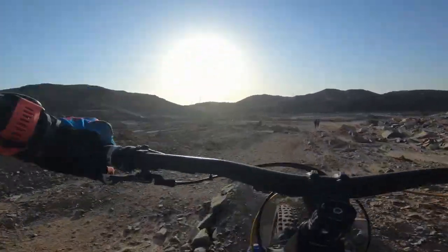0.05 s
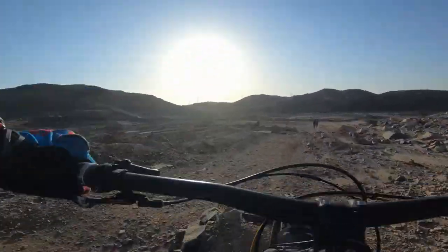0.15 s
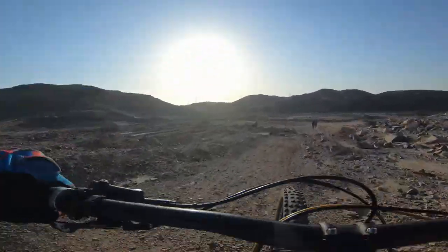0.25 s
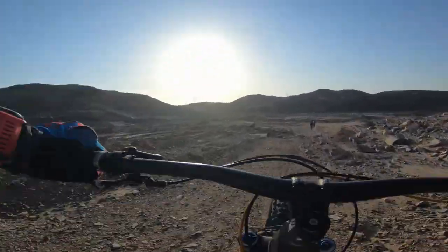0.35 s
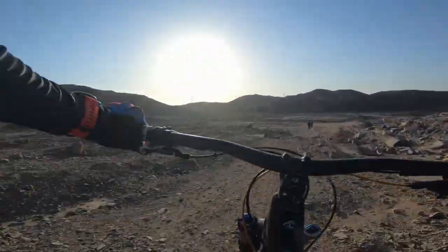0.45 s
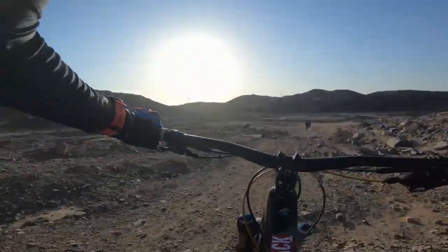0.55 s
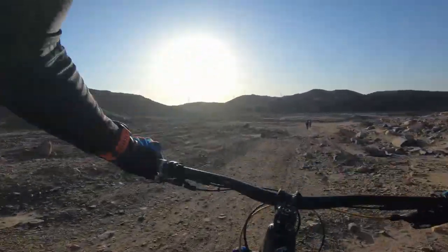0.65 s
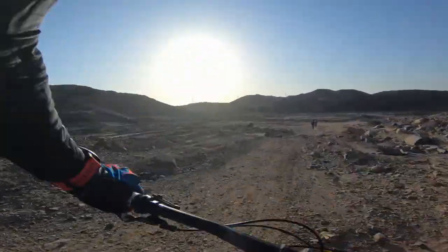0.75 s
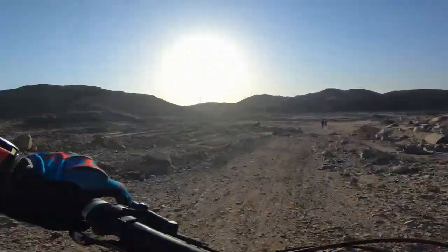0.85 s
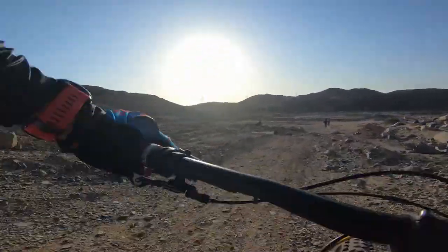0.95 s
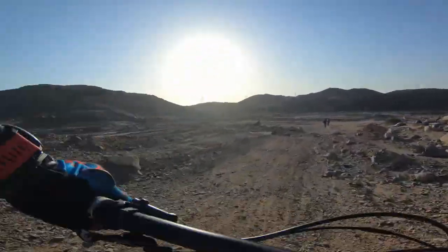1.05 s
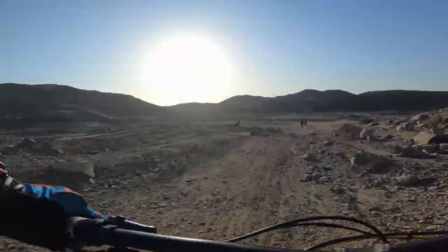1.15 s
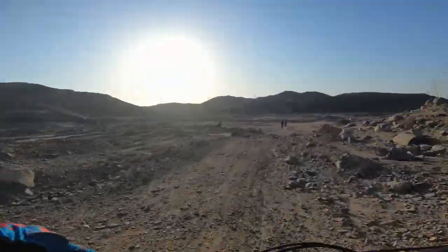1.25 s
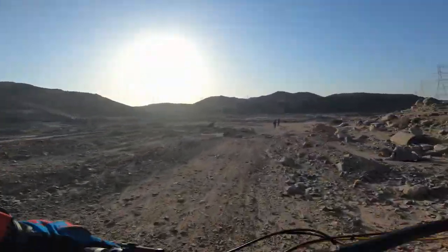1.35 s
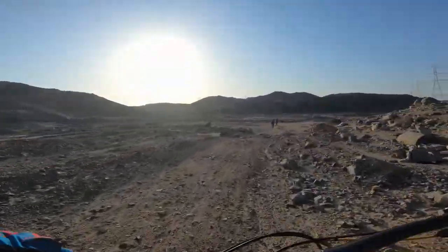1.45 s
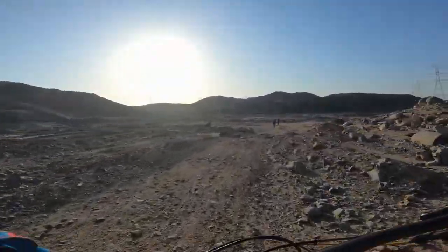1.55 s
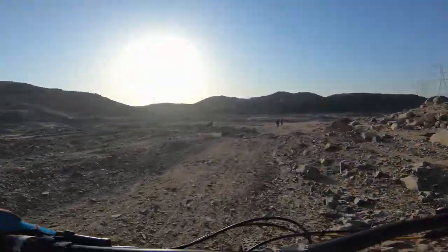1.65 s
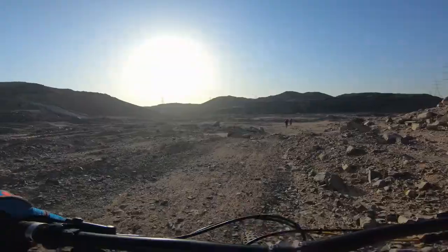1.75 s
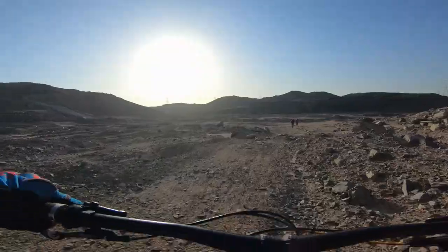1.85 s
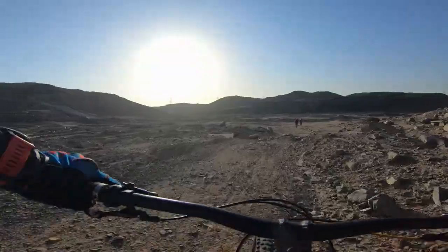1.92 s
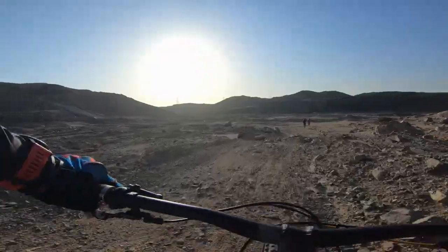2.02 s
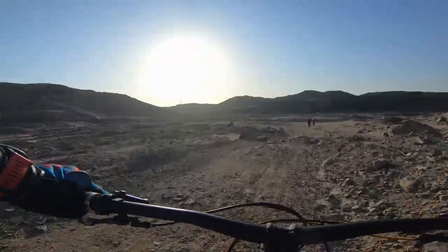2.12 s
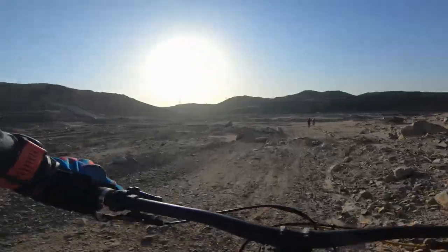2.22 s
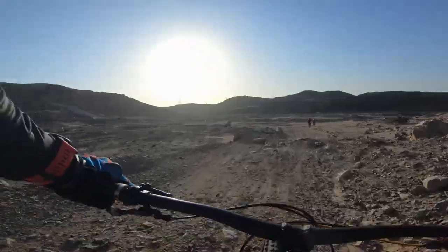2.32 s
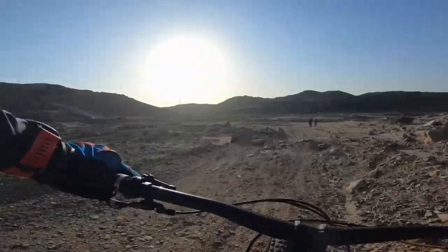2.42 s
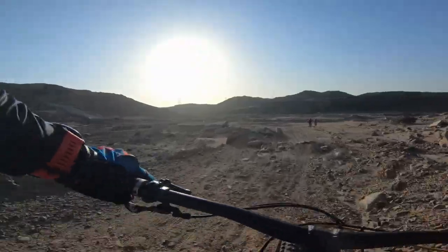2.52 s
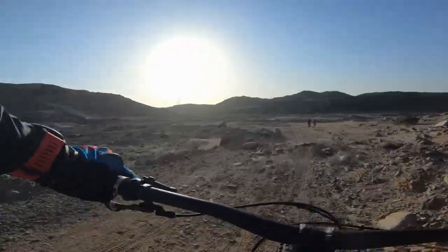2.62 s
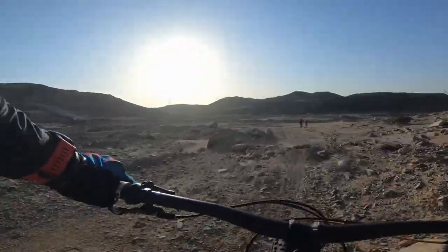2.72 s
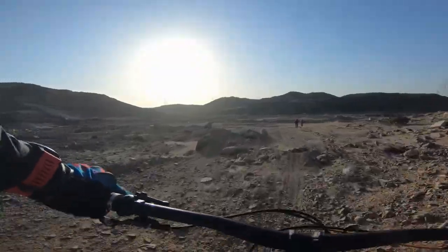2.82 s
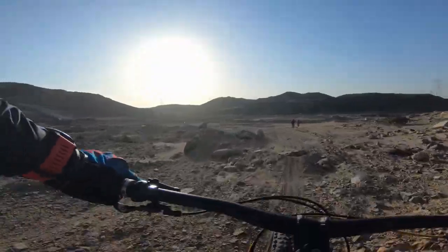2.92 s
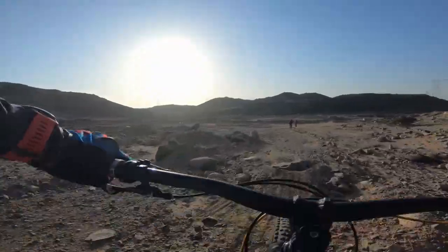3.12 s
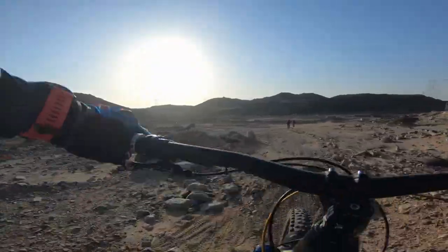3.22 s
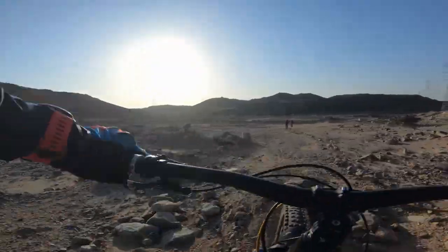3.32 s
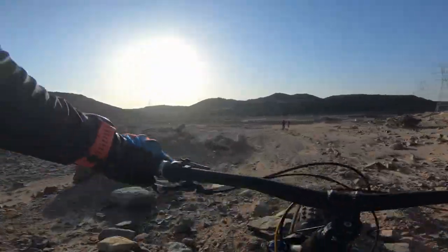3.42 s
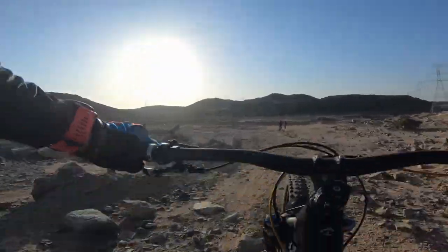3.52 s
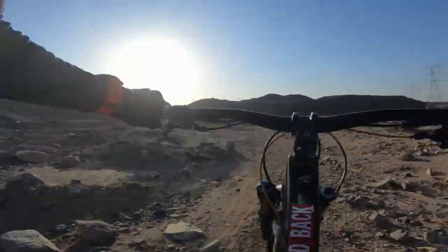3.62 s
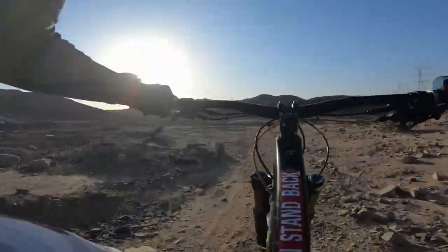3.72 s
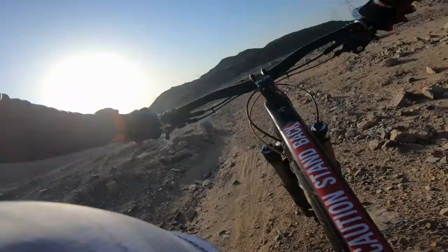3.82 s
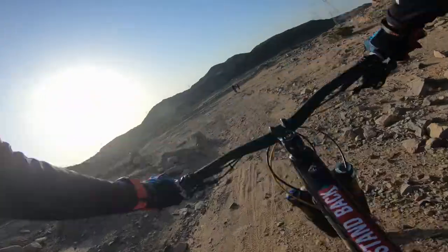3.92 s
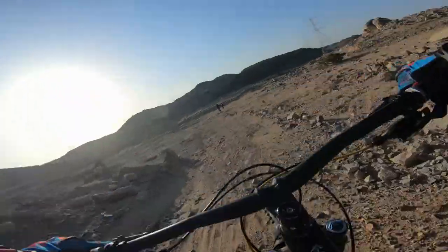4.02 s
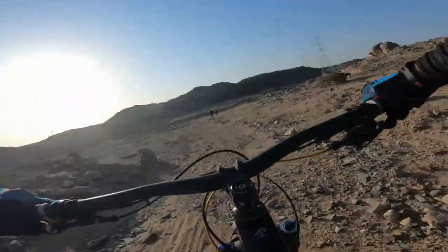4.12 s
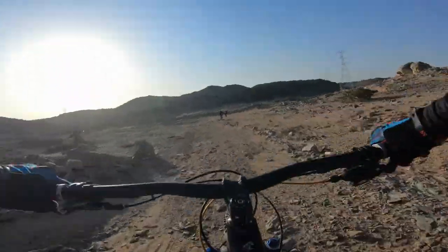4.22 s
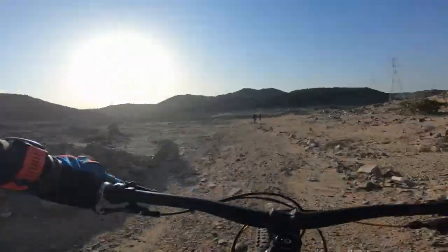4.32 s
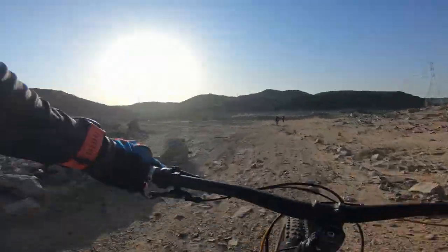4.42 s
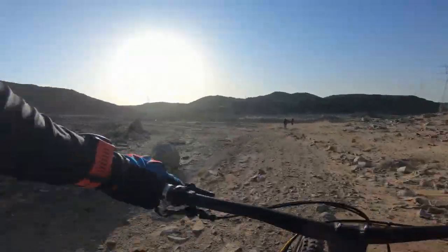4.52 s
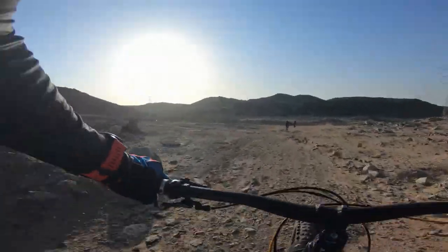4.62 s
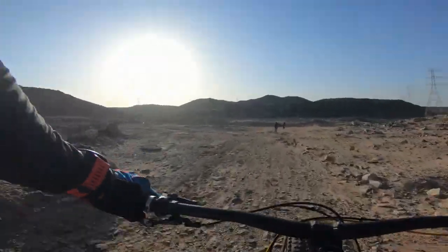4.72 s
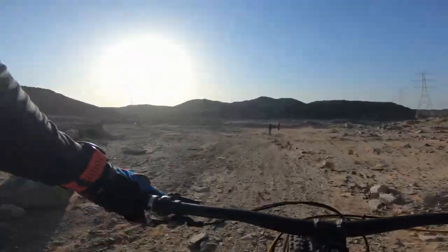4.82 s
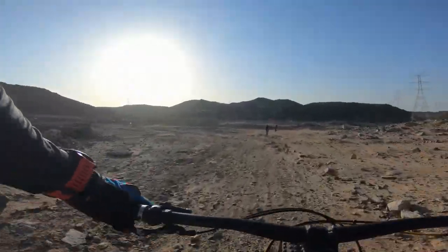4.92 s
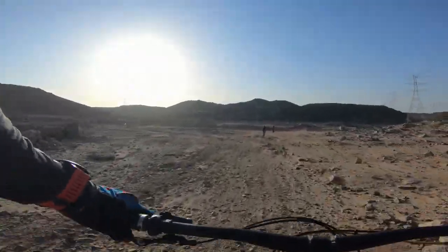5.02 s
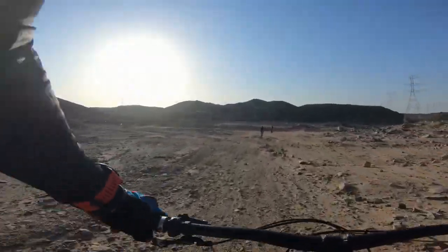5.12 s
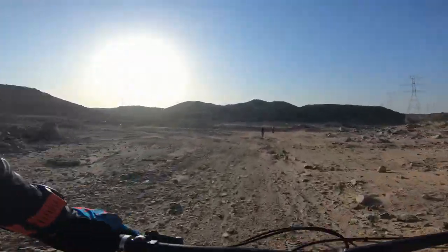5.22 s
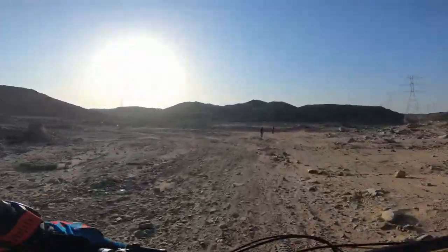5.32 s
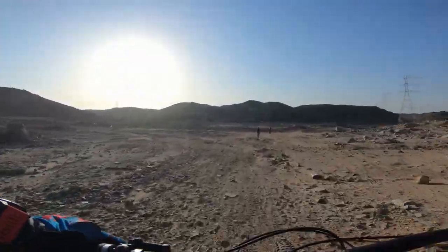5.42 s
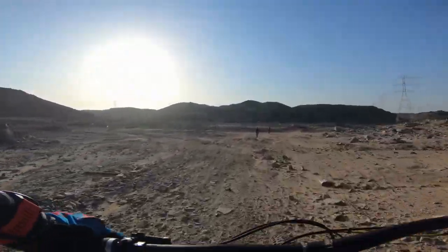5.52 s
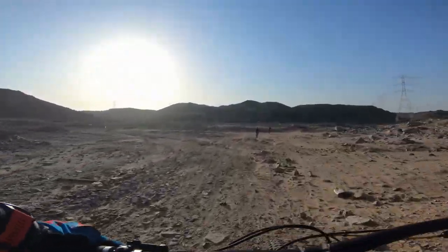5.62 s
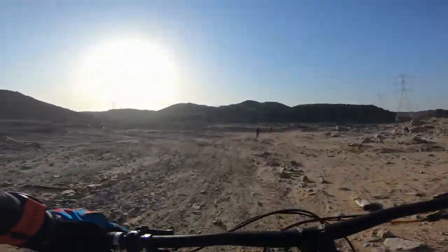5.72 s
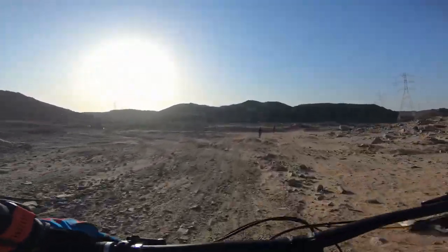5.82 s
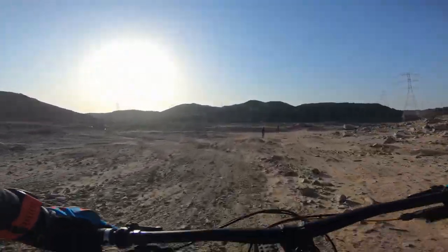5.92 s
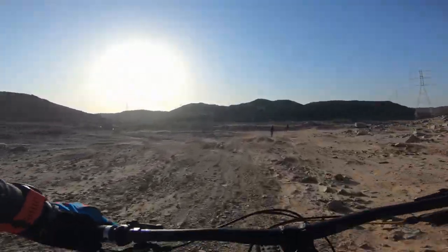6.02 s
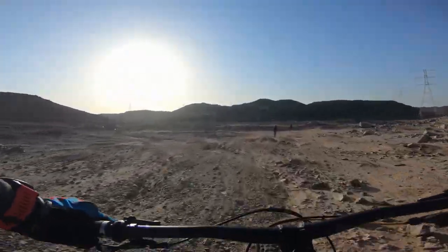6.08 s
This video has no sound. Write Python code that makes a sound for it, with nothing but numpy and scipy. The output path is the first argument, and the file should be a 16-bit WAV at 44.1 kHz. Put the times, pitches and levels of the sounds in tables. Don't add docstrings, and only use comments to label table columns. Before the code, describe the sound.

A bicycle rattles down a stony trail, tyres crunching gravel under low buffeting wind, with a violent clattering double slam over a rock past halfway.

```python
import sys
import numpy as np
from scipy import signal
from scipy.fft import rfft, irfft
from scipy.io import wavfile
from scipy.ndimage import uniform_filter1d

SR = 44100
rng = np.random.default_rng(int(sys.argv[2]) if len(sys.argv) > 2 else 0)


def gain_from_db(level_db):
    decades = np.asarray(level_db, float) / 20
    return 10 ** decades


def pcm_store(signal):
    levels = np.round(np.clip(np.atleast_2d(signal), -1, 1) * 32767)
    wavfile.write(sys.argv[1], SR, levels.astype(np.int16).T)


N = 271215


def evened(x):
    return x / np.sqrt(np.mean(x ** 2) + 1e-20)


def peaked(x, db):
    return x * gain_from_db(db) / np.abs(x).max()


def smoothed(x, size):
    return uniform_filter1d(uniform_filter1d(x, size=size), size=size)


def curves(rows):
    s, *columns = np.transpose(rows)
    return [np.interp(np.arange(N) / SR, s, c) for c in columns]


def ramp(s, length, edge):
    t = np.arange(N) / SR
    return np.clip(np.minimum(t - s, s + length - t) / edge, 0, 1)


def coloured(x, points):
    f, db = np.transpose(points)
    hz = np.fft.rfftfreq(len(x), 1 / SR)
    shape_db = np.interp(np.log(hz + 1), np.log(f + 1), db)
    return irfft(rfft(x) * gain_from_db(shape_db), len(x))


def resonate(x, modes):
    out = np.zeros(len(x))
    for hz, width, db in modes:
        r = np.exp(-np.pi * width / SR)
        pole = r * np.exp(2j * np.pi * hz / SR)
        out += gain_from_db(db) * 2 * signal.lfilter([(1 - r) ** 2], [1, -2 * pole, pole ** 2], x).real
    return out


def lumps(hz, depth_db):
    pole = np.exp(-2 * np.pi * hz / SR)
    slow = signal.lfilter([1], np.poly([pole] * 2), rng.standard_normal(N))
    return evened(gain_from_db(depth_db * evened(slow)))


def scattered(drive, modes, depth_db):
    out = np.zeros(N)
    for mode in modes:
        polarity = rng.choice([-1., 1.], N)
        out += resonate(drive * polarity * lumps(17, depth_db), [mode])
    return evened(out)


def puff(noise, length, rise):
    t = np.arange(len(noise)) / SR
    return noise * (1 - np.exp(-t / rise)) * np.exp(-t / np.maximum(length, 1e-4))


def add(mix, s, sound):
    start = round(s * SR)
    sound = sound[max(-start, 0):]
    part = mix[max(start, 0):][:len(sound)]
    part += sound[:len(part)]


# (t/s, load level/dB, spray level/dB)
TYRE_PATH = [(0.0, -51, -60.5), (0.45, -55, -61), (1.08, -52.5, -65), (1.28, -52.5, -64),
             (1.52, -49, -62.5), (1.87, -44.5, -60), (2.43, -47, -56), (2.77, -46.5, -57.5),
             (3.05, -45, -55.5), (3.37, -42.5, -53.5), (3.53, -44, -51.5), (3.68, -48.5, -52),
             (3.94, -51, -63), (4.13, -54, -64), (4.68, -49, -63), (5.02, -51, -61.5), (5.48, -46, -61),
             (6.15, -44.5, -55.5)]
# (start t/s, length t/s, extra load level/dB)
LOOSE_PATCHES = [(0.132, 0.22, 5), (0.757, 0.16, 8.5), (0.967, 0.041, 4), (1.292, 0.044, 7),
                 (1.388, 0.061, 5), (1.59, 0.068, 4), (2.044, .05, 5), (2.79, 0.2, 3), (3.74, 0.11, 4.5),
                 (3.837, 0.036, 8), (3.956, 0.19, 4.5), (4.38, .25, 2), (5.154, 0.098, 1.5),
                 (5.656, 0.08, -0.5)]


def tyre():
    load_db, spray_db = curves(TYRE_PATH)
    extra_db = sum(db * ramp(s, length, edge=0.014) for s, length, db in LOOSE_PATCHES)
    return load_db + extra_db, spray_db + 0.42 * extra_db


# (start t/s, length t/s, change of level/dB)
BRACE = (3.77, 0.27, -6)


def hush_db():
    s, length, db = BRACE
    return db * ramp(s, length, edge=0.03)


# (t/s, gust level/dB, mount shaking level/dB)
GUSTS = [(0.0, -32.5, -39.5), (0.36, -32, -47), (0.7, -28.5, -33), (1.06, -31.5, -39), (1.3, -30.5, -45.5),
         (1.47, -29, -41.5), (1.97, -35, -46), (2.88, -30, -41.5), (3.65, -33, -43.5), (3.92, -23.5, -32),
         (4.08, -37.5, -39.5), (4.31, -33, -41.5), (4.47, -33, -40.5), (4.85, -28.5, -46.5),
         (5.19, -36.5, -43.5), (5.57, -30, -42.5), (5.84, -40, -42.5), (6.15, -31.5, -44)]
# (f/Hz, level/dB)
BUFFET_SPECTRUM = [(8.8, -47), (15, 1.5), (64, 4.5), (115, -3.5), (140, -14), (180, -47.5), (310, -120)]
# (f/Hz, level/dB)
FLUTTER_SPECTRUM = [(82, -35), (140, -0.5), (253, -14), (330, -21), (430, -49), (730, -120)]
# (f/Hz, level/dB)
ROAR_SPECTRUM = [(190, -35), (330, -2), (613, -4.5), (918, -14), (1100, -10), (1430, -32), (2420, -120)]


def wind():
    gust_db, shake_db = curves(GUSTS)
    load_db, _ = tyre()
    roar_db = -45.5 + 0.34 * (shake_db + 42) + 0.62 * (load_db + 48)
    swings = evened(coloured(rng.standard_normal(N), BUFFET_SPECTRUM))
    size = np.sqrt(smoothed(swings ** 2, 1500) + 1e-3)
    buffet = evened(swings * size ** 0.12)
    eddies = rng.standard_normal(N) * lumps(14, depth_db=2.0) * lumps(72, depth_db=2.0)
    flutter = evened(coloured(eddies, FLUTTER_SPECTRUM))
    roar = evened(coloured(eddies, ROAR_SPECTRUM))
    return gain_from_db(gust_db + 6.5) * buffet + gain_from_db(shake_db + 5.5) * flutter + gain_from_db(roar_db) * roar


def whistle():
    centre_hz, width_hz, waver_hz = 2565, 130, 60
    waver = evened(smoothed(rng.standard_normal(N), 2000))
    turn = np.exp(2j * np.pi * np.cumsum(centre_hz + waver_hz * waver) / SR)
    r = np.exp(-np.pi * width_hz / SR)
    breath = rng.standard_normal(N) * lumps(18, depth_db=3.0)
    slow = signal.lfilter([1], [1, -2 * r, r ** 2], breath / turn)
    _, spray_db = tyre()
    level_db = -58 + 0.4 * (spray_db + 57.4) + 1.8 * hush_db()
    return gain_from_db(level_db) * evened((slow * turn).real)


# (t/s, peak level/dB, pitch f/Hz)
SNAPS = [(0.0732, -28.5, 1050), (0.1111, -35, 1530), (0.1474, -32.5, 1450), (0.6898, -37, 1020),
         (0.7628, -30, 1210), (0.877, -31, 1600), (0.9176, -34.5, 1300), (0.9628, -31.5, 1400),
         (0.9834, -35, 1590), (1.076, -34, 1700), (1.144, -34, 1430), (1.3009, -35, 1750),
         (1.3229, -31, 1340), (1.4029, -30, 1170), (1.457, -34, 1490), (1.6007, -30, 1260),
         (1.6382, -25, 1450), (1.6658, -32, 1650), (1.7455, -36, 1140), (1.7998, -23, 1460),
         (1.8701, -33, 1660), (1.9728, -34, 1560), (2.0004, -34, 1430), (2.0413, -33, 1630),
         (2.0821, -24.5, 1440), (2.2318, -23.5, 1580), (2.362, -32, 1330), (2.392, -30.5, 1580),
         (2.4693, -34, 1470), (2.5421, -33.5, 1390), (2.8265, -21.5, 1520), (2.869, -27.5, 1310),
         (2.957, -25.5, 1130), (3.014, -41, 1590), (3.0803, -34, 1580), (3.0986, -26.5, 1370),
         (3.3177, -31, 1340), (3.5234, -28, 1510), (3.755, -40, 1480), (3.7858, -27, 1490),
         (3.8047, -26, 1250), (3.8496, -28.5, 1200), (3.8908, -23, 1100), (3.92, -34, 1060),
         (3.9512, -35, 1110), (3.9914, -26.5, 1140), (4.0405, -26, 1860), (4.4245, -34, 1560),
         (4.564, -30.5, 1440), (4.5989, -33, 1140), (4.741, -34, 1580), (5.1847, -28, 1640),
         (5.2824, -30, 1680), (5.3642, -28.5, 1470), (5.5044, -31, 1300), (5.5707, -31.5, 1280),
         (5.657, -28, 1690), (5.6994, -33, 1530), (5.7149, -27, 1520), (6.0342, -28.5, 1680)]


def hanging():
    hang_s, depth = 0.0065, 0.24
    marks = np.zeros(N)
    marks[[round((s - hang_s) * SR) for s, db, hz in SNAPS]] = 1
    dip = np.convolve(marks, np.hanning(round(1.3 * hang_s * SR)))[:N]
    return 1 - np.clip(depth * dip, 0, 0.9)


# (f/Hz, width f/Hz, level/dB)
TYRE_MODES = [(1197, 120, 0.5), (1504, 790, 5), (1750, 180, 1.5)]
# (f/Hz, width f/Hz, level/dB)
HOUSING_MODES = [(2517, 330, 9), (2900, 1300, -1.5)]
# (f/Hz, width f/Hz, level/dB)
GRIT_MODES = [(3300, 750, -3.5), (3750, 920, 3), (4730, 900, -2), (5235, 610, -1.5), (5800, 500, -9),
              (6380, 820, -8), (7450, 790, -7), (8030, 1200, -13), (9700, 5200, -23)]


def gravel():
    grains_per_s, spread_db, grain_share = 500, 4.5, 0.47
    load_db, spray_db = tyre()
    size = gain_from_db(spread_db * np.minimum(rng.exponential(1, N), 3.2)) * rng.choice([-1., 1.], N)
    grains = evened(size * (rng.random(N) < grains_per_s / SR))
    rolling = rng.standard_normal(N)
    drive = np.sqrt(grain_share) * grains + np.sqrt(1 - grain_share) * rolling
    drive = drive * lumps(55, depth_db=1.5)
    ring_drive = np.roll(drive, N // 3)
    grit_drive = np.roll(drive, -N // 3) + 1.3 * rng.standard_normal(N)
    crunch = gain_from_db(load_db + 3.5) * hanging() * scattered(drive, TYRE_MODES, depth_db=1.5)
    ring_db = -52.5 + 0.6 * (spray_db + 58.5) + hush_db()
    ring = gain_from_db(ring_db) * scattered(ring_drive, HOUSING_MODES, depth_db=2.0)
    grit = gain_from_db(spray_db + 2.0) * scattered(grit_drive, GRIT_MODES, depth_db=2.0)
    top = coloured(grit, [(6500, -62.5), (8500, -3.5)])
    top_gain = gain_from_db(0.59 * uniform_filter1d(spray_db + 61.0, size=8000)) - 1
    return crunch + ring + grit + top_gain * top


# (t/s, peak level/dB, centre f/Hz, length t/s)
GRIT_CHIPS = [(0.111, -50, 3600, 0.0046), (0.307, -44.5, 6500, 0.008), (0.57, -42, 3660, .007),
              (0.659, -42, 4170, 0.0047), (0.793, -53, 5370, 0.0043), (0.853, -39, 3500, 0.009),
              (0.932, -38.5, 3960, 0.0032), (1.3483, -43, 3550, 0.0056), (1.6375, -43, 6000, 0.0036),
              (2.041, -39.5, 3500, .007), (2.065, -44, 3400, 0.0048), (2.54, -39, 3670, 0.0076),
              (2.819, -52, 3540, 0.005), (3.4805, -28.5, 5400, 0.005), (3.481, -31, 2800, 0.005),
              (3.484, -45, 7340, 0.0046), (3.527, -36, 5000, 0.009), (3.536, -42, 7650, 0.011),
              (3.543, -40, 5000, 0.008), (3.974, -49.5, 5800, 0.0094), (4.013, -44, 4960, 0.0064),
              (4.044, -39.5, 4350, 0.0062), (4.924, -44.5, 4800, 0.0068), (5.442, -40.5, 3450, 0.0094),
              (0.4209, -47, 3870, 0.005), (0.4549, -45, 3660, 0.005), (0.5935, -54, 3930, 0.005),
               (0.7297, -52, 3450, 0.005), (0.765, -48, 3430, 0.005), (0.8155, -40, 3700, 0.005),
               (1.198, -50, 3290, 0.005), (1.4082, -38, 3000, 0.005), (1.605, -46, 3280, 0.005),
               (1.685, -39, 3080, 0.005), (1.7479, -50, 3220, 0.005), (1.8163, -41, 3690, 0.0046),
               (1.8357, -44, 3840, 0.005), (1.8647, -47, 3920, 0.005), (1.9744, -50, 3480, 0.005),
               (3.0984, -46, 3150, 0.005), (3.8586, -46, 3010, 0.005), (3.904, -44, 3130, 0.005),
               (4.001, -44.5, 3290, 0.005), (4.197, -46, 3290, 0.005), (4.2727, -50, 3670, 0.005),
               (4.7421, -40, 3320, 0.005), (4.858, -49, 3090, 0.005), (5.004, -45, 3300, 0.005),
               (5.101, -39, 3140, 0.0059), (5.194, -43, 3200, 0.005), (5.5792, -47, 3500, 0.005),
               (5.8491, -48, 3660, 0.005)]


def chips():
    out = np.zeros(N)
    for s, db, hz, length in GRIT_CHIPS:
        burst = puff(rng.standard_normal(2000), length / 2, rise=0.00024)
        crack = resonate(burst, [(hz, 0.43 * hz, 0)])
        housing = gain_from_db(3.0) * resonate(crack, HOUSING_MODES + GRIT_MODES)
        add(out, s, peaked(crack + housing, db + 2.5))
    return out


# (t/s, peak level/dB, pitch f/Hz)
BUSY_SNAPS = [(.688, -31.5, 1730), (.758, -33, 2000), (0.86, -29, 1300), (3.536, -40, 1500),
              (3.544, -35, 1500), (3.859, -21, 1420), (3.874, -27, 1500), (3.881, -26, 1400),
              (3.9, -27.5, 1300), (4.183, -33, 980), (1.9, -34, 1340), (5.7145, -32, 1200),
              (5.657, -33, 1500), (1.194, -35, 1000)]


def stones():
    out = np.zeros(N)
    housing = [(HOUSING_MODES[0][0], 400, -14), (GRIT_MODES[1][0], 700, -22)]
    for s, db, hz in SNAPS + BUSY_SNAPS:
        crack = puff(rng.standard_normal(1500), 0.002, rise=0.00053)
        rung = resonate(crack, [(hz, 450, 0)] + housing)
        add(out, s - 0.0008, peaked(resonate(rung, [(1490, 1900, 0)]), db + 1.0))
    return out


# (start t/s, length t/s, level/dB)
GRINDING = [(.68, 0.017, -34), (0.758, .014, -37), (1.395, 0.024, -32.5), (1.457, 0.021, -30.5),
            (2.661, .032, -32), (3.252, .045, -33.5), (3.752, 0.028, -31), (3.778, .018, -34),
            (3.8, 0.023, -29), (3.85, 0.019, -23.5), (3.869, .015, -22.5), (3.892, .017, -20.5),
            (3.916, .018, -27.5), (3.944, .018, -24), (3.96, .022, -29), (3.989, .016, -37),
            (4.035, 0.025, -36.5)]
# (f/Hz, level/dB)
GRIND_SPECTRUM = [(120, -26), (250, 4), (550, -2), (1000, -11), (1800, -18), (3000, -33.5), (5000, -45),
                  (8000, -70)]


def shudders():
    rubbing = rng.standard_normal(N) * lumps(170, depth_db=2.5)
    noise = evened(coloured(rubbing, GRIND_SPECTRUM))
    return noise * sum(gain_from_db(db) * ramp(s, length, edge=0.0024) for s, length, db in GRINDING)


# (centre
# t/s, peak level/dB, centre f/Hz)
FRAME_KNOCKS = [(0.0743, -34, 774), (0.1134, -31, 620), (0.6216, -33, 386), (0.6658, -29.5, 680),
                (0.689, -22.5, 315), (0.7658, -37, 980), (0.8318, -21, 440), (0.854, -19, 413),
                (1.2025, -31.5, 780), (1.3375, -25, 546), (1.355, -27, 500), (1.4046, -18.5, 740),
                (1.4662, -24.5, 557), (1.817, -24.5, 516), (2.067, -27, 566), (2.0832, -29, 885),
                (2.2325, -28.5, 1030), (2.545, -27.5, 735), (2.646, -23.5, 500), (2.6798, -22, 500),
                (2.8303, -27.5, 704), (3.139, -29, 890), (3.2633, -29, 557), (3.269, -23, 507),
                (3.29, -34, 586), (3.4013, -29.5, 557),
                (3.755, -22, 534), (3.7685, -15.5, 475), (3.776, -27, 410), (3.786, -25, 936),
                (3.815, -19, 610), (3.8193, -18, 547), (3.851, -21.5, 810), (3.8628, -12, 520),
                (3.875, -16, 744), (3.8778, -19, 560), (3.8867, -19, 380), (3.894, -8.5, 490),
                (3.9009, -7.5, 765), (3.9206, -15, 557), (3.926, -23, 600), (3.95, -23.5, 673),
                (3.9531, -13, 562), (3.9775, -22.5, 530), (3.981, -25, 389), (3.9958, -27, 1100),
                (4.0022, -35.5, 696), (4.0386, -32, 856), (4.064, -24.5, 496),
                (0.582, -36, 754), (.984, -27, 600), (1.0934, -34, 500), (1.6395, -31, 730),
              (1.7466, -37, 900), (3.5804, -29.5, 610), (3.9963, -27, 1130), (4.185, -35, 900),
              (4.1982, -31.5, 940), (0.492, -34.5, 375), (3.963, -31, 700), (3.7948, -37, 544),
              (3.806, -25, 774), (4.7495, -33, 720), (5.099, -32, 430)]


def knocks():
    out, t = np.zeros(N), np.arange(-500, 1800) / SR
    blow = np.exp(-(t / 0.0022) ** 2)
    rattle = 0.1 * (t > 0) * np.exp(-t / 0.0093)
    for s, db, hz in FRAME_KNOCKS:
        crackle_db = -16.5 + 0.17 * (db + 16.5)
        body = [(0.607 * hz, 200, 1.5), (hz, 0.68 * hz, 0), (1.71 * hz, 900, -9), (2300, 1600, crackle_db)]
        rung = resonate(rng.standard_normal(len(t)) * (blow + rattle), body)
        rung = resonate(rung, [(500, 1800, 0)])
        add(out, s + t[0] - 0.0007, peaked(rung, db + 0.5))
    return out


# (centre t/s, peak level/dB, pitch f/Hz, width t/s)
JOLTS = [(0.049, -10.5, 69.6, 0.007), (0.1142, -10.5, 79, 0.012), (0.207, -13.5, 73, 0.023),
         (0.4952, -9, 85, 0.011), (0.6252, -12.5, 65, 0.026), (.687, -5.5, 73, 0.01),
         (0.8527, -5.5, 120, 0.0051), (1.1163, -13, 60, 0.009), (1.316, -13.5, 90.5, 0.01),
         (1.334, -15, 101, 0.007), (1.4077, -13.5, 93, 0.016), (1.4256, -10, 99, 0.01),
         (1.443, -12, 80, 0.026), (1.4724, -12.5, 107, 0.0096), (1.533, -19.5, 79, 0.01),
         (1.653, -14, 74, 0.0061), (1.818, -11.5, 97, 0.014), (2.6839, -10, 122, 0.0058),
         (2.802, -10, 83, 0.01), (2.8197, -8.5, 95, 0.0048), (3.0416, -19, 64, 0.036),
         (3.2695, -12, 126, 0.013), (4.3005, -13, 57, 0.0061), (4.353, -16, 100, 0.0072),
         (4.419, -13.5, 69.5, 0.011), (4.477, -9, 68, 0.012), (4.506, -14.5, 55, 0.024),
         (4.699, -15.5, 84.5, 0.017), (4.8375, -12, 82, 0.0061), (5.562, -13.5, 82, 0.011)]
# (centre t/s, peak level/dB, pitch f/Hz, width t/s)
ROCK_SLAMS = [
    (3.7456, -11, 78, 0.0056),
    (3.774, -9.5, 62, 0.029),
    (3.811, -11, 104, 0.017),
    (3.8584, -4.5, 120, 0.004),
    (3.8813, -10, 91, 0.011),
    (3.896, -6.5, 93, .012),
    (3.931, -14.5, 105, 0.013),
    (3.967, -7, 75.6, 0.01),
    (4.0693, -12, 62, 0.02),
]
# (centre t/s, peak level/dB, pitch f/Hz, width t/s)
LIGHT_NUDGES = [(0.075, -14, 69, 0.028), (0.567, -16.5, 62, 0.0099), (0.5847, -24, 98, .0055),
                (0.825, -16.5, 92, 0.024), (1.2286, -21.5, 75, 0.049), (1.289, -13, 58.3, 0.016),
                (1.619, -15, 69.4, 0.008), (2.7768, -16.5, 92, 0.0066), (2.9, -13, 70.4, 0.0049),
                (3.062, -15.5, 87, 0.0096), (3.529, -19, 58.5, 0.015), (4.798, -22.5, 67.5, 0.0048),
                (5.484, -16.5, 71.5, 0.02), (6.131, -13.5, 85, 0.0086),
                (1.958, -33, 75.4, 0.014), (2.152, -26, 72.7, 0.013), (2.275, -29, 75.4, 0.012),
               (2.344, -20.5, 88.8, 0.013), (2.559, -18.5, 59.2, 0.014), (4.968, -26, 113, 0.014),
               (5.189, -23, 56.5, 0.016), (5.31, -32, 75.4, 0.017), (5.821, -26, 86.1, 0.013),
               (6.034, -32, 83.4, 0.014)]


def thumps():
    out, t = np.zeros(N), np.arange(-4000, 4000) / SR
    for s, db, hz, width in JOLTS + ROCK_SLAMS + LIGHT_NUDGES:
        phase, kick_phase = rng.random(2)
        swing = np.exp(-(t / (0.62 * width)) ** 2) * np.sin(2 * np.pi * (hz * t + phase))
        kick = np.exp(-(t / (0.77 * width)) ** 2) * np.sin(2 * np.pi * (2.08 * hz * t + kick_phase))
        add(out, s + t[0], gain_from_db(db + 1.5) * (swing + gain_from_db(-16.0) * kick))
    return out


# (first t/s, last t/s, level/dB)
STEP_RUNS = [
    (3.7588, 3.795, -54.5),
    (3.807, 3.813, -50.5),
    (3.835, 3.84, -63.5),
]
# (first t/s, level/dB)
TRIPLE_STEPS = [(0.0453, -70), (0.0692, -77), (0.1999, -72), (0.392, -77), (0.6853, -66.5), (0.7547, -76),
                (0.824, -74.5), (1.0879, -72.5), (1.2745, -72.5), (1.4027, -74), (1.6482, -74),
                (2.7975, -73.5), (3.7279, -74.5), (3.8561, -71), (3.896, -68.5), (3.9494, -69),
                (4.0612, -69.5), (4.296, -76), (4.4159, -75), (4.4774, -67), (4.7975, -76), (4.84, -71),
                (5.5598, -73)]


def ticks():
    block_s = 256 / 48000
    out = np.zeros(N)
    for first, last, db in STEP_RUNS:
        at = np.round(np.arange(first, last, block_s) * SR).astype(int)
        uneven = rng.standard_normal(len(at))
        sign = np.sign(rng.standard_normal(len(at)))
        out[at] += gain_from_db(db + 12.5 + 2.5 * uneven) * sign
    for s, db in TRIPLE_STEPS:
        at = np.round((s + block_s * np.arange(3)) * SR).astype(int)
        out[at] += gain_from_db(db + np.array([13.0, 11.0, 7.0]))
    return out


def thinned(x):
    weak_db, from_hz, bins = -108, 8300, 9
    hz, t, z = signal.stft(x, SR, nperseg=1024)
    band = np.arange(len(hz)) // bins
    power = np.add.reduceat(abs(z) ** 2, np.arange(0, len(hz), bins), axis=0) / bins
    power_db = 10 * np.log10(power + 1e-20)
    over_db = power_db - weak_db - 4.0 * rng.standard_normal(power_db.shape)
    over_db = uniform_filter1d(over_db, size=5, axis=1)
    gate = 1 / (2 + np.exp(-np.clip(3.0 * over_db, -30, 30)))
    keep = np.where(hz[:, None] > from_hz, gate[band], 1)
    return signal.istft(z * keep, SR, nperseg=1024)[1][:len(x)]


# (f/Hz, level/dB)
PORT_RESPONSE = [(8500, -3), (9500, -5), (10500, -8.5), (11500, -11), (13000, -16.5), (16000, -45)]


def scene():
    air = wind() + whistle() + gravel() + chips() + stones() + shudders() + knocks() + thumps()
    padded = np.pad(air, 2000, "reflect")
    heard = thinned(coloured(padded, PORT_RESPONSE))[2000:-2000]
    return (heard + ticks())[None]


def band_limit(x):
    return signal.sosfilt(signal.butter(12, 15700, fs=SR, output="sos"), x)


def record(dry):
    ceiling = 1.6
    hissy = dry + gain_from_db(-99) * rng.standard_normal(dry.shape)
    return band_limit(ceiling * np.tanh(hissy / ceiling))


dry = scene()
out = record(dry)
pcm_store(out)
```